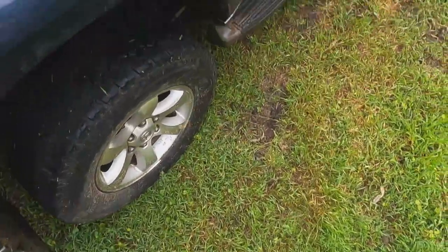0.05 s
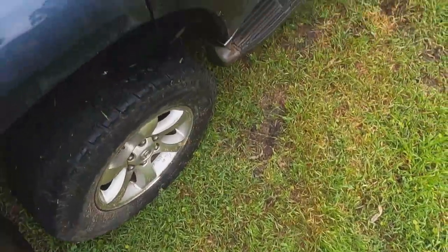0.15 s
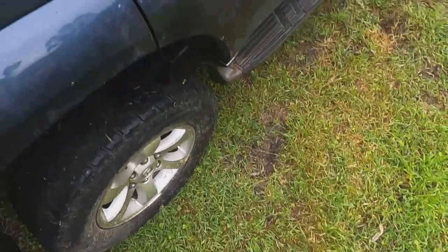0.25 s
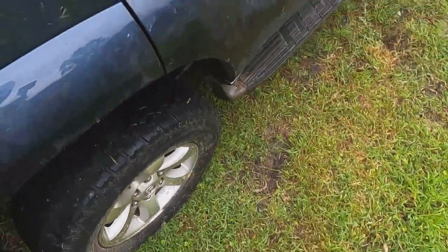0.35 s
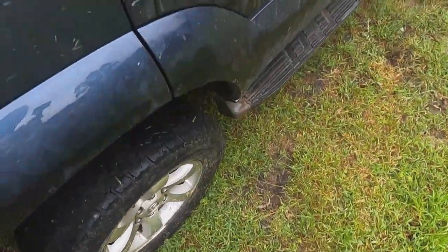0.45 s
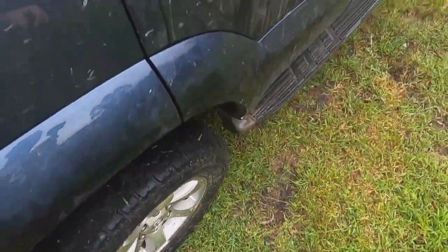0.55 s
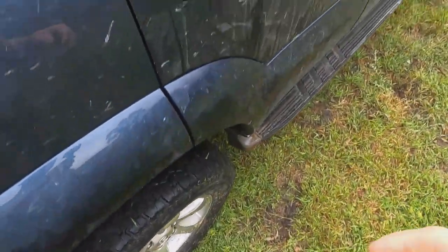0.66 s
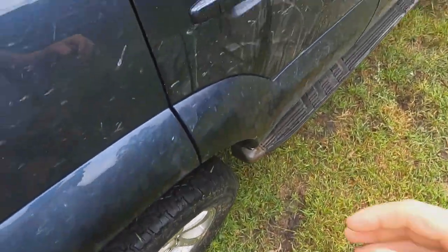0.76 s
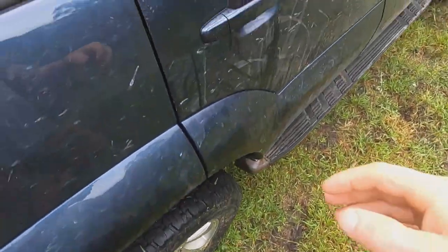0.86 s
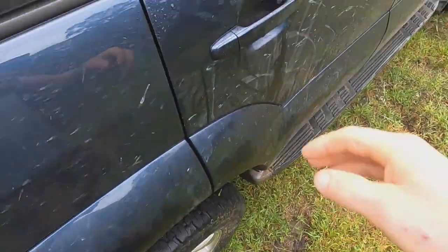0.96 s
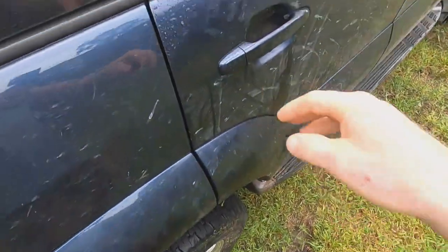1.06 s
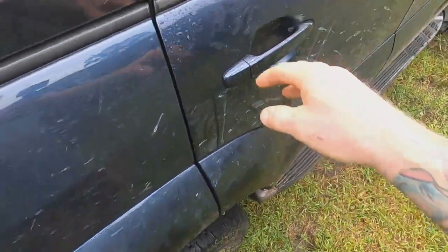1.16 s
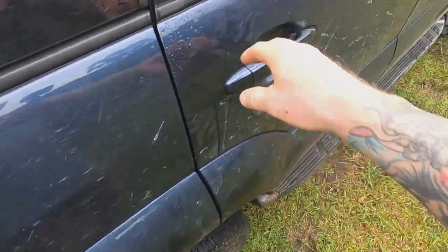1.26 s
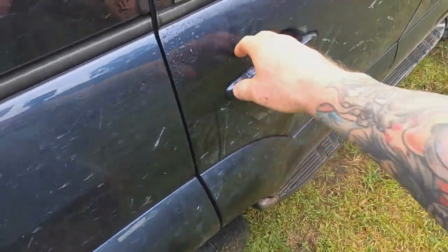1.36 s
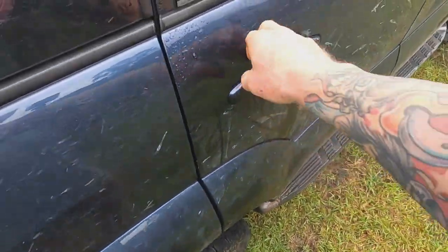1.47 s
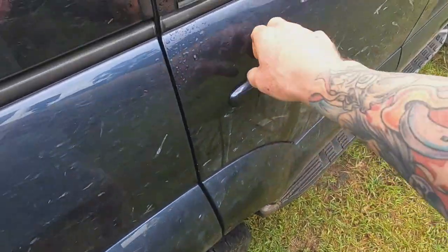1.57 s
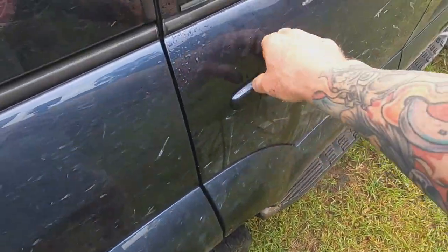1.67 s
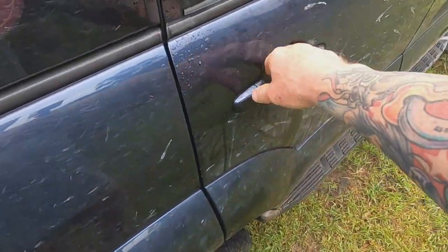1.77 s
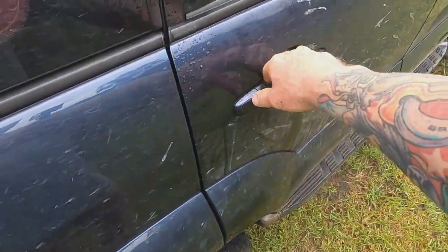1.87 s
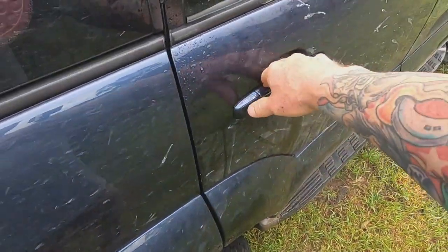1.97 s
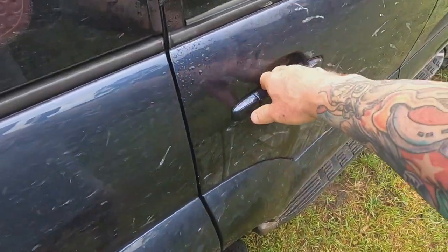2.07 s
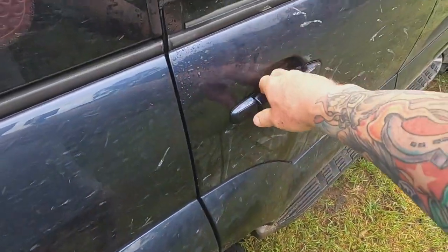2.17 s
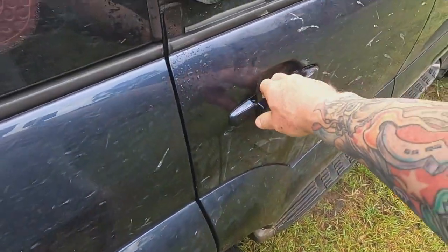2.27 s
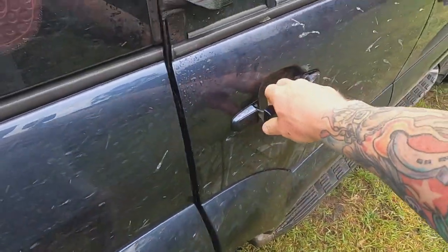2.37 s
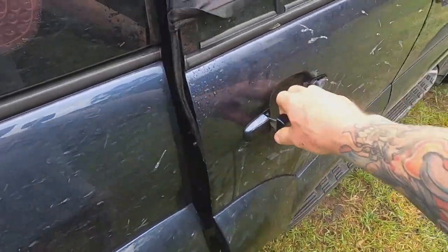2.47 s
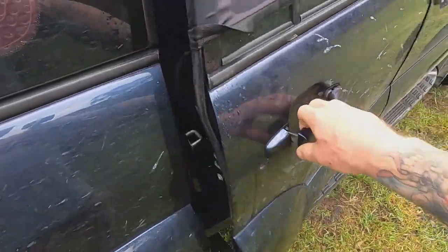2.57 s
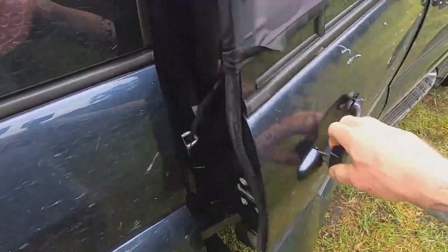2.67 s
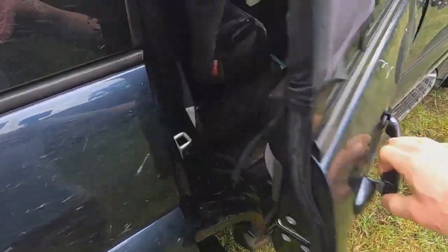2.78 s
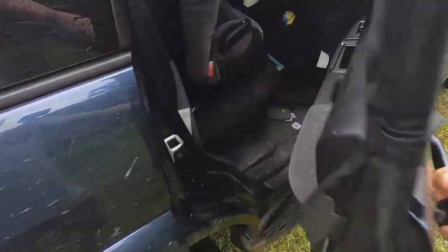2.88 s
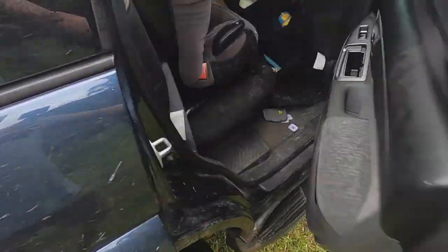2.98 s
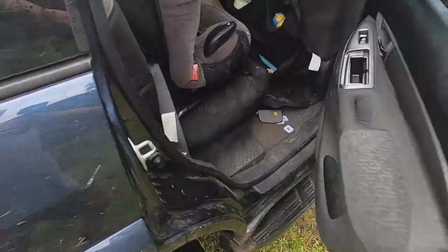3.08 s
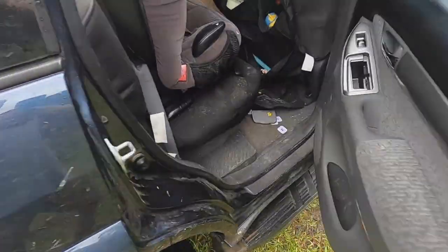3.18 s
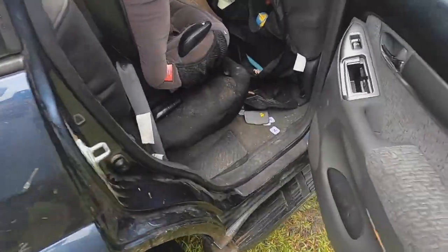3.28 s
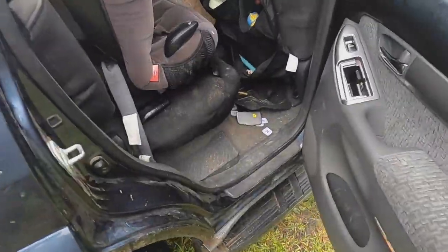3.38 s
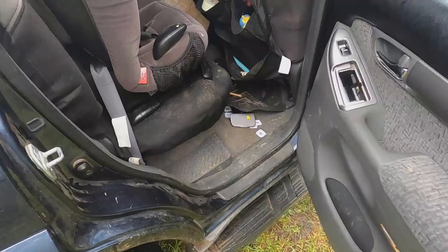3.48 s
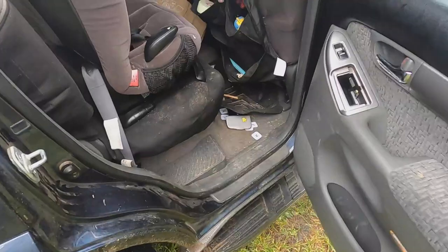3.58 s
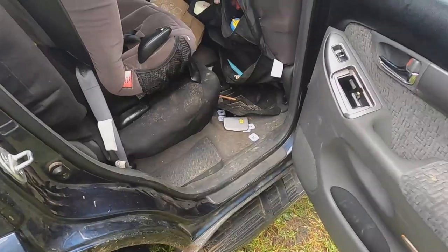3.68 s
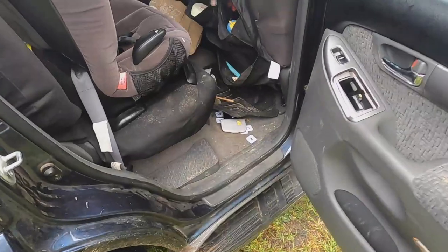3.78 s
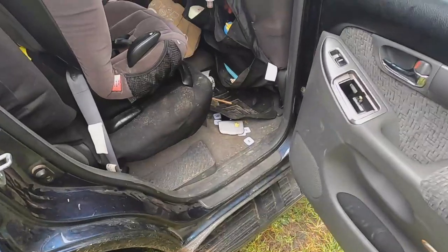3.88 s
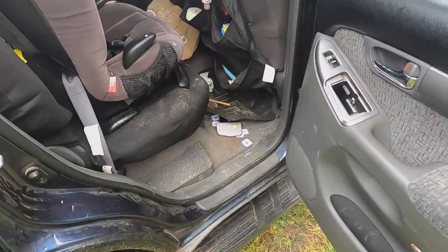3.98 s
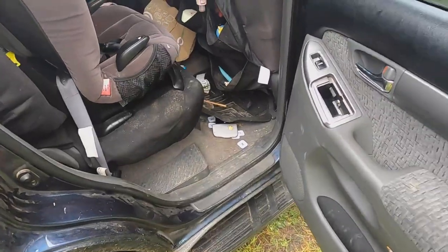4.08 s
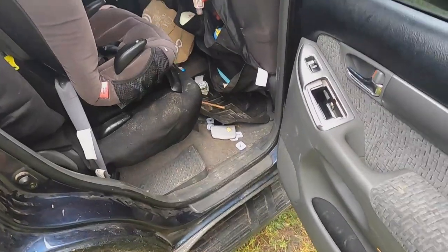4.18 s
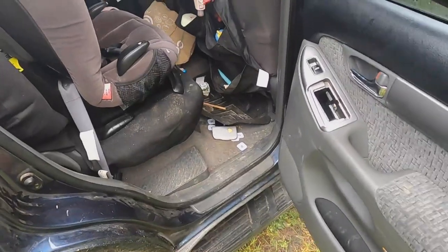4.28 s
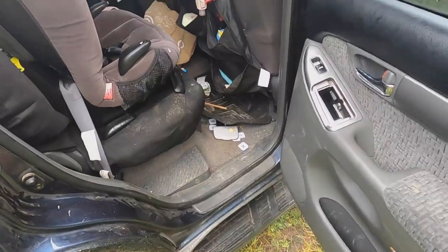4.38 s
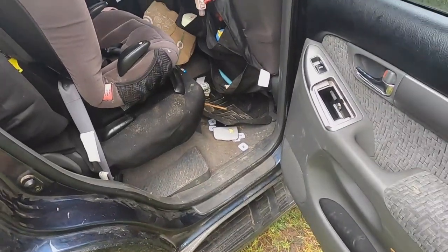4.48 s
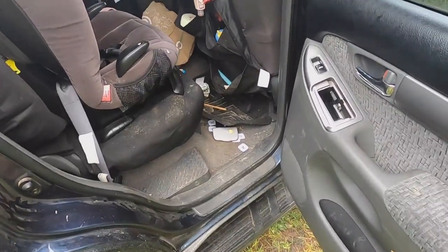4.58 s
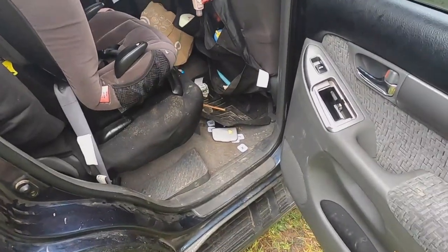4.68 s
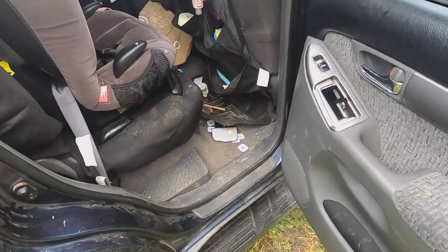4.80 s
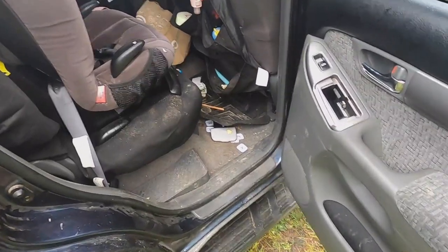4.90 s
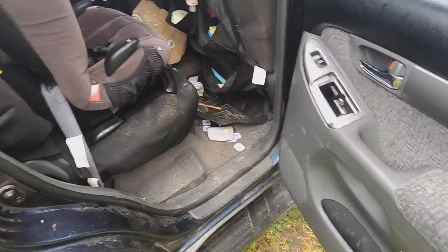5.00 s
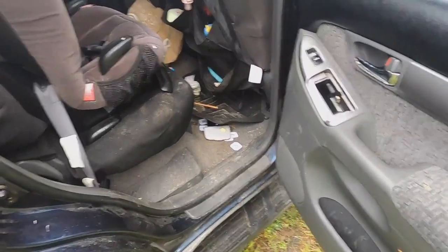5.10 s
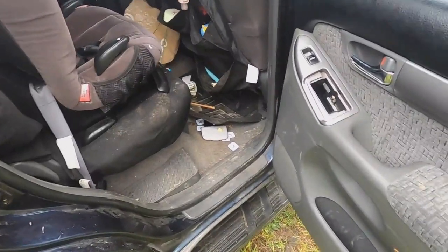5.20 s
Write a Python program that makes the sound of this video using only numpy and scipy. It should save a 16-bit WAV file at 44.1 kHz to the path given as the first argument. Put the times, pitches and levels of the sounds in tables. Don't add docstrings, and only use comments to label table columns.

```python
import sys
import numpy as np
from scipy import signal
from scipy.fft import rfft, irfft, next_fast_len
from scipy.io import wavfile
from scipy.ndimage import uniform_filter1d, map_coordinates

SR = 44100
rng = np.random.default_rng(int(sys.argv[2]) if len(sys.argv) > 2 else 0)


def wav_record(signal):
    frames = np.transpose(np.atleast_2d(signal))
    bounded = np.clip(frames, -1, 1)
    quanta = np.round(bounded * 32767).astype(np.int16)
    wavfile.write(sys.argv[1], SR, quanta)


def field_ratio(decibels):
    return 10 ** (np.asarray(decibels, dtype=float) / 20)


N = 231418


def unit(x):
    return x / np.sqrt(np.mean(x ** 2) + 1e-20)


def along(points, hz):
    f, v = np.transpose(points)
    return np.interp(np.log(hz + 1), np.log(f + 1), v)


def curve(rows):
    s, values = np.transpose(rows)
    return np.interp(np.arange(N) / SR, s, values)


def wobble(rate_hz):
    knots = rng.standard_normal(int(N * rate_hz / SR) + 4)
    return map_coordinates(knots, [np.arange(N) * rate_hz / SR])


def filtered(x, response):
    m = next_fast_len(len(x) + 8192)
    return irfft(rfft(x, m) * response(np.fft.rfftfreq(m, 1 / SR)), m)[:len(x)]


def coloured(x, spectrum):
    return unit(filtered(x, lambda hz: field_ratio(along(spectrum, hz))))


def noise(spectrum, size=N):
    return coloured(rng.standard_normal(size), spectrum)


def lumpy_noise(depth_db, rate_hz):
    return rng.standard_normal(N) * field_ratio(depth_db * wobble(rate_hz))


def add(track, s, x):
    at = round(s * SR)
    x = x[max(-at, 0):]
    part = track[max(at, 0):][:len(x)]
    part += x[:len(part)]


def swells(rows, shape):
    t = np.arange(N) / SR
    gain = np.zeros(N)
    for peak_s, rise_s, fall_s, db in rows:
        distance = np.where(t < peak_s, (peak_s - t) / rise_s, (t - peak_s) / fall_s)
        gain += field_ratio(db - 20 * distance ** shape)
    return gain


def hollow(x, modes):
    def response(f):
        total = 0
        for k, (centre_hz, width_hz, db) in enumerate(modes):
            damping = 1j * f * width_hz
            total = total + (-1) ** k * field_ratio(db) * damping / (centre_hz ** 2 - f ** 2 + damping)
        return total / (1 + (f / 4500) ** 4)
    return unit(filtered(x, response))


def struck(blows, modes, rattle_hz, rattle_t60_s):
    # (multiple of centre frequency [1], level [dB])
    crack = [(.12, -37.5), (.5, 14.5), (1, 6.5), (2, 2), (3.5, -20), (6, -34), (14, -65.5)]
    out = np.zeros(N)
    t = np.arange(SR // 2) / SR
    hz, level_db, t60_s = np.transpose(modes)[..., None]
    sign = (-1) ** np.arange(len(hz))[:, None]
    contact_s = t[::round(0.002 * SR)]
    for s, db, soft_hz, rattle_db in blows:
        luck = rng.standard_normal((2, len(hz), 1))
        reach = sign * field_ratio(level_db + 1.5 * luck[0]) / (1 + (hz / soft_hz) ** 2)
        twin = 0.56 * np.sin(2 * np.pi * hz * (1.07 + 0.025 * luck[1]) * t)
        tones = np.sin(2 * np.pi * hz * t) + twin
        ring = np.sum(reach * field_ratio(-60 * t / t60_s) * tones, axis=0)
        ring = ring * (1 - np.exp(-t * soft_hz))

        centre_hz = rattle_hz * (soft_hz / 1000) ** 0.39
        rattle = noise([(k * centre_hz, d) for k, d in crack], size=len(t))
        rattle = rattle * field_ratio(-60 * t / rattle_t60_s) * (1 - np.exp(-t / 0.0015))
        chatter = np.r_[1, rng.standard_normal(len(contact_s) - 1)]
        rattle = rattle * field_ratio(4 * np.interp(t, contact_s, chatter) - 1.5)
        add(out, s, field_ratio(db + 1) * ring + field_ratio(rattle_db) * rattle)
    return out


def latch():
    # (time [s], level [dB], softness [Hz], rattle level [dB])
    blows = [(2.505, -36, 300, -38), (2.514, -8.5, 200, -44), (2.519, -22.5, 2000, -20.5),
             (2.523, -33, 900, -15.5), (2.528, -9.5, 350, -38), (2.536, -26, 300, -40),
             (2.5445, -23.5, 2500, -22.5), (2.547, -18, 3000, -19), (2.556, -21.5, 1490, -23.5),
             (2.575, -33.5, 1500, -39), (2.583, -34, 1200, -39), (2.596, -28.5, 900, -26),
             (2.603, -34.5, 1100, -27.5), (2.614, -33, 2000, -33.5), (2.65, -27.5, 200, -44)]
    # (frequency [Hz], level [dB], t60 [s])
    shell = [(36.4, -2, 0.16), (50.4, -9.5, 0.24), (88.6, -19.5, 0.49), (132.4, -5, 0.083), (163, -9, 0.19),
             (215, -5, 0.084), (257, 1.5, 0.023), (387.3, -13, 0.19), (450, -16.5, 0.23),
             (662, -3.5, 0.081), (806, -5, 0.088), (860, -1, 0.067), (956, -6.5, 0.13), (1178, -2.5, 0.045),
             (1430, -9, 0.071), (1764, -23, 0.073), (2350, -7, 0.012), (3000, -4.5, 0.032)]
    return struck(blows, shell, 915, 0.036)


def handle_grab():
    # (time [s], level [dB], softness [Hz], rattle level [dB])
    blows = [
        (1.556, -48, 300, -58),
        (1.568, -32.5, 400, -54),
        (1.574, -39, 400, -51),
        (1.583, -28.5, 280, -44),
    ]
    # (frequency [Hz], level [dB], t60 [s])
    panel = [(50.5, -1.5, 0.28), (93.5, -10, 0.39), (148.4, 0, 0.22), (238.7, -1, 0.21), (450, -24, 1)]
    return struck(blows, panel, 1500, 0.098)


def rods_pull():
    # (time [s], level [dB], softness [Hz], rattle level [dB])
    blows = [
        (2.291, -28.5, 900, -33.5),
        (2.302, -26.5, 590, -49),
        (2.314, -44, 698, -40),
        (2.326, -27.5, 510, -54),
        (2.413, -32, 900, -40),
    ]
    # (frequency [Hz], level [dB], t60 [s])
    rods = [(157.4, -17, 0.36), (243, 1, 0.059), (350, -4, 0.11), (465, -7, 0.11), (670, -6, 0.13),
            (787, -7, 0.24), (1190, -11, 0.038), (1540, -30, 0.063), (2800, -34, .04)]
    return struck(blows, rods, 740, 0.16)


def linkage():
    # (time [s], level [dB], softness [Hz], rattle level [dB])
    lift = [
        (2.341, -29.5, 2496, -31.5),
        (2.347, -32.5, 1200, -43),
        (2.400, -48, 2500, -35),
        (2.409, -37, 900, -45),
        (2.419, -41, 1500, -46),
    ]
    # (time [s], level [dB], softness [Hz], rattle level [dB])
    snap = [
        (2.403, -35.5, 2520, -37.5),
        (3.3, -51, 2500, -50.5),
        (3.37, -52, 2500, -50.5),
    ]
    # (frequency [Hz], level [dB], t60 [s])
    link = [(262, -11, 0.036), (400, -4, 0.1), (600, -4.5, 0.18), (682, 1.5, 0.049), (1098, -5, 0.057),
            (2680, 0, 0.032)]
    return struck(lift, link, 840, 0.026) + struck(snap, link, 2140, 0.04)


def fastener_pop():
    # (time [s], level [dB], softness [Hz], rattle level [dB])
    blows = [
        (2.665, -30, 9000, -47),
    ]
    # (frequency [Hz], level [dB], t60 [s])
    fastener = [(900, -5, .012), (1700, 0, 0.014), (2700, 0.5, .012), (4240, -3, .01), (5900, -2.5, .012),
                (8900, -13, .008), (12000, -24, .008)]
    return struck(blows, fastener, 1500, 0.01)


def seals():
    # (time [s], level [dB], centre frequency [Hz], t60 [s])
    ticks = [(1.558, -32, 1220, 0.025), (1.575, -41, 1250, 0.017), (1.583, -34, 1150, 0.017),
             (2.271, -34.5, 3800, 0.022), (2.404, -21, 3000, 0.043), (2.517, -41.5, 5340, 0.28),
             (2.546, -45.5, 5580, 0.076), (2.519, -31, 4810, 0.01), (2.553, -31.5, 3200, .025),
             (2.577, -34, 2700, .015), (2.615, -35, 2400, .015), (2.617, -48, 6000, .006),
             (2.637, -46.5, 6050, 0.0065), (2.6525, -37, 6800, .005), (2.665, -30.5, 5800, 0.02),
             (2.672, -29.5, 3520, 0.013), (2.701, -43, 6500, .008), (2.704, -44, 6500, 0.008),
             (2.7264, -25.5, 4000, 0.012), (2.7244, -40.5, 10000, 0.015), (2.7329, -37.5, 9500, 0.016),
             (2.738, -33, 5000, 0.023), (2.733, -29.5, 800, 0.036), (2.74, -34, 1270, 0.11),
             (2.747, -25.5, 3880, 0.033), (2.749, -37.5, 10300, 0.017)]
    out = np.zeros(N)
    t = np.arange(SR // 20) / SR
    for s, db, centre_hz, t60_s in ticks:
        colour = [(centre_hz / 14, -30), (centre_hz / 6, -6), (centre_hz, 0),
                  (centre_hz * 1.42, -12), (centre_hz * 1.79, -16), (centre_hz * 4, -48)]
        decay = field_ratio(-60 * t / t60_s) + field_ratio(1.5 - 60 * t / 0.0023)
        attack = 1 - np.exp(-t / 0.0005)
        add(out, s, field_ratio(db - 8) * decay * attack * noise(colour, size=len(t)))
    return out


def stop_bump():
    # (time [s], level [dB], softness [Hz], rattle level [dB])
    blows = [
        (3.252, -37, 505, -52),
        (3.286, -32, 600, -46),
        (3.34, -56, 600, -45),
        (3.98, -44, 400, -53.5),
        (4.024, -41, 300, -75),
    ]
    # (frequency [Hz], level [dB], t60 [s])
    stop = [(36, -22.5, 0.45), (96.6, -1, 0.22), (204, 0, 0.075), (275, 0, 0.084), (399, -2, 0.078),
            (600, -13, 0.16), (900, -39, .06)]
    return struck(blows, stop, 1600, 0.15)


def sill_landing():
    # (time [s], level [dB], softness [Hz], rattle level [dB])
    blows = [
        (4.305, -44.5, 300, -52),
        (4.319, -27.5, 600, -35),
        (4.334, -27, 300, -53.5),
        (4.365, -27.5, 80, -62),
    ]
    # (frequency [Hz], level [dB], t60 [s])
    sill = [(36, -6.5, 0.32), (102.6, 1, .35), (160, -10.5, 0.27), (217, 2, .1), (280, -2.5, .1),
            (382, -8.5, .1), (556, -7, .07), (1066, -30, 0.047), (1432, -28, .05)]
    return struck(blows, sill, 1100, 0.1)


def frame_knock():
    # (time [s], level [dB], softness [Hz], rattle level [dB])
    blows = [
        (.698, -54.5, 400, -50),
        (1.262, -53, 300, -46),
        (4.488, -34.5, 495, -53),
        (4.520, -27, 1544, -21),
        (4.524, -26.5, 700, -28.5),
        (4.527, -12.5, 900, -22.5),
        (4.5465, -12, 400, -30.5),
        (4.6, -31.5, 400, -59.5),
    ]
    # (frequency [Hz], level [dB], t60 [s])
    frame = [(85, -22, 0.24), (99, -19, 0.27), (157.2, -14.5, 0.31), (210, -6.5, 0.21), (240, -6, 0.22),
             (259, 10, 0.044), (350, -7, 0.12), (486, -8, 0.093), (640, -11, 0.102), (891, -20.5, 0.13),
             (1352, -24.5, 0.1), (1770, -30.5, .05)]
    return struck(blows, frame, 840, 0.09)


def effort_over_middle_db():
    # (time [s], level [dB])
    effort = [(0, -91), (1.1, -76.5), (1.28, -72), (1.95, -66.5), (2.27, -60.5), (2.42, -38), (2.48, -55),
              (2.72, -47), (2.86, -60.5), (2.89, -45), (3.15, -51.5), (3.3, -39.5), (3.44, -45),
              (3.62, -56), (4.25, -57.5), (4.47, -55.5), (4.54, -45.5), (4.76, -76.5)]
    return curve(effort) + 55


def hinge_groan(effort_db):
    # (centre frequency [Hz], width [Hz], level [dB])
    hinge = [(102.9, 29, -13.5), (157.8, 24, 1), (230, 22, -4.5), (276.6, 14.5, -4)]
    # (peak time [s], rise [s], fall [s], level [dB])
    catches = [
        (.69, .05, 0.29, -70),
        (2.1, .1, 0.09, -65),
        (3.99, 0.076, 0.028, -47.5),
        (4.33, 0.022, 0.13, -33.5),
    ]
    gain = field_ratio(effort_db - 55) + swells(catches, shape=1.1)
    return field_ratio(2.3) * gain * hollow(lumpy_noise(1.7, 40), hinge)


def scrape(effort_db):
    # (centre frequency [Hz], width [Hz], level [dB])
    skin = [(415.6, 68, 2.5), (684.4, 110, 0), (725.4, 120, -0.5), (1150, 320, -5), (1620, 1400, -10.5)]
    # (peak time [s], rise [s], fall [s], level [dB])
    rubs = [
        (0, .1, 0.63, -62),
        (.48, 0.2, 0.17, -67.5),
        (.69, 0.042, 0.29, -66.5),
        (1.22, 0.16, 0.12, -58.5),
        (1.85, 0.86, 0.94, -57),
        (3.0, 0.32, 1, -53),
        (4.48, 0.0097, 0.11, -44.5),
        (5.1, 0.22, 0.36, -66.5),
    ]
    gain = field_ratio(-59.5 + 0.53 * effort_db) + swells(rubs, shape=1.23)
    return field_ratio(-4) * gain * hollow(lumpy_noise(1.6, 90), skin)


def check_strap():
    # (peak time [s], rise [s], fall [s], level [dB])
    moans = [
        (3.17, 0.092, .09, -45),
        (3.322, 0.037, 0.041, -42),
        (3.392, 0.034, 0.026, -34),
        (3.432, 0.024, 0.0096, -36),
    ]
    # (peak time [s], rise [s], fall [s], level [dB])
    drags = [
        (2.9, .03, 0.15, -55.5),
        (3.07, 0.058, .08, -60),
        (3.17, 0.087, 0.092, -48.5),
        (3.325, 0.058, 0.035, -46),
        (3.365, 0.028, 0.07, -51.5),
    ]
    # (centre frequency [Hz], width [Hz], level [dB])
    skin = [(800, 41, 1.5), (970, 16, 2.5), (1175, 140, -6), (1436, 41, -3), (2000, 270, -12)]
    phase = 2 * np.pi * 268 * np.arange(N) / SR + 0.36 * wobble(40)
    moan = swells(moans, shape=1.8) * np.sqrt(2) * np.sin(phase)
    drag = swells(drags, shape=1.5) * hollow(lumpy_noise(2.6, 120), skin)
    return moan + drag


def air_sway(effort_db):
    # (frequency [Hz], level [dB])
    colour = [(12, -13.5), (22, 8), (32, -19.5), (50, -9), (80, -10.5), (200, -72)]
    # (peak time [s], rise [s], fall [s], level [dB])
    lurches = [(.2, 0.71, 1.34, -75.5), (1.3, 0.025, 0.07, -61), (2.36, 0.1, .1, -57),
               (2.86, 0.21, 0.036, -48), (3.02, 0.09, 0.36, -49.5), (3.29, 0.023, 1.5, -38.5),
               (3.6, 0.25, 0.065, -42), (3.87, 0.17, 0.15, -63), (4.0, 0.12, 0.038, -44.5),
               (4.11, 0.072, 0.081, -52), (4.37, 0.045, .3, -49.5), (4.6, 0.08, 0.06, -64.5)]
    breeze_db = -99.5
    gain = field_ratio(breeze_db) + field_ratio(-67.5 + 1.2 * effort_db) + swells(lurches, shape=1.6)
    return field_ratio(4) * gain * unit(field_ratio(3.3 * wobble(20)) * noise(colour))


def swing():
    effort_db = effort_over_middle_db()
    return check_strap() + air_sway(effort_db) + hinge_groan(effort_db) + scrape(effort_db)


def trees(x):
    # (frequency [Hz], t60 [s])
    decay = [(500, 0.094), (3000, 0.22), (8000, 0.098)]
    hz, t, z = signal.stft(rng.standard_normal(SR // 2), SR, nperseg=256)
    z = z * field_ratio(-60 * t / along(decay, hz)[:, None])
    tail = signal.istft(z, SR, nperseg=256)[1]
    return signal.fftconvolve(np.pad(x, (300, 0)), tail / np.linalg.norm(tail))[:N]


def whistled(rows):
    out = np.zeros(N)
    for s, length_s, first_hz, last_hz, db in rows:
        u = np.arange(round(length_s * SR)) / (length_s * SR)
        change_hz = last_hz - first_hz
        bow_hz = max(0.354 * change_hz, 0.053 * change_hz)
        hz = first_hz + change_hz * u + 4 * bow_hz * u * (1 - u)
        envelope = np.abs(np.sin(np.pi * u ** 0.78)) ** 0.86
        add(out, s, field_ratio(db) * envelope * np.sin(2 * np.pi * np.cumsum(hz) / SR))
    return out


def sagging(rows):
    return [(s, length_s, hz * 1.004, hz * 0.996, db) for s, length_s, hz, db in rows]


def near_bird():
    glides = [(-.004, 0.028, 4260, 3000, -40), (0.117, 0.023, 4400, 2900, -39),
              (0.253, 0.0091, 5070, 4330, -45), (0.258, 0.009, 4400, 3870, -41),
              (0.362, 0.016, 3920, 3070, -41), (0.399, 0.027, 3290, 2140, -41),
              (.506, 0.013, 3490, 2320, -39.5), (0.529, .012, 2140, 2050, -49),
              (0.56, 0.036, 2260, 2650, -39), (0.719, 0.012, 3820, 3100, -40),
              (.732, 0.0083, 3030, 2200, -45), (0.907, 0.018, 3860, 2940, -40.5),
              (0.921, 0.025, 2800, 1890, -43), (1.091, 0.017, 3730, 2950, -39),
              (1.105, 0.018, 2870, 1920, -40), (1.287, 0.022, 3000, 1910, -41),
              (1.32, .057, 1754, 2065, -50.5), (1.647, 0.023, 2820, 2040, -42.5),
              (1.765, 0.0085, 4550, 3700, -47), (1.774, .016, 3690, 2950, -50),
              (.011, 0.011, 2900, 2050, -50), (.133, .012, 2320, 1900, -64),
              (2.012, 0.037, 2220, 2490, -49.5), (4.667, 0.026, 4930, 4720, -59)]
    # (time [s], length [s], frequency [Hz], level [dB])
    held = [(.379, 0.015, 3000, -35), (0.395, 0.012, 3430, -33.5), (0.489, 0.023, 3535, -44),
            (0.709, 0.017, 4080, -52), (1.125, 0.066, 1874, -50.5), (1.269, 0.021, 3090, -46.5),
            (1.45, 0.019, 2110, -48), (1.612, 0.02, 2680, -47), (1.631, 0.02, 3000, -47)]
    # (delay [s], level [dB])
    trunks = [(.011, -20), (.019, -18), (.028, -17), (.043, -22)]
    call = whistled(glides + sagging(held)) * field_ratio(3 * wobble(250))
    t = np.arange(SR // 30) / SR
    twigs = rng.standard_normal(len(t)) * field_ratio(-60 * t / 0.03)
    blur = signal.fftconvolve(call * field_ratio(5.4 * wobble(300)), twigs / np.linalg.norm(twigs))[:N]
    out = call + field_ratio(-7) * blur + field_ratio(-10.5) * trees(call * field_ratio(3.8 * wobble(150)))
    for delay_s, db in trunks:
        echo = np.pad(call + blur, (round(delay_s * SR), 0))[:N]
        out += field_ratio(db + 4.8 * wobble(200)) * echo
    return out


def far_bird():
    # (time [s], length [s], frequency [Hz], level [dB])
    whistles = [(3.552, 0.023, 4500, -59), (3.83, .015, 5500, -74), (3.954, .036, 6050, -65),
                (4.036, 0.016, 4740, -54), (4.068, .014, 4800, -64), (4.068, 0.012, 5220, -55),
                (4.15, 0.027, 6280, -70), (4.228, 0.023, 5540, -70), (4.307, 0.039, 5280, -54),
                (4.333, 0.042, 5220, -49.5), (4.394, 0.043, 5250, -60), (4.45, 0.046, 5250, -65.5),
                (4.53, .14, 5250, -71.5), (4.572, 0.076, 5830, -57.5), (4.622, 0.023, 5900, -57),
                (4.65, 0.041, 5800, -74), (4.76, 0.059, 5850, -76.5), (4.686, 0.03, 4726, -54.5),
                (4.846, 0.037, 5420, -62), (4.93, 0.027, 5410, -52), (4.874, 0.097, 5354, -54),
                (4.99, 0.056, 5400, -52.5), (5.05, 0.053, 5440, -63), (5.09, .06, 5400, -65),
                (5.157, 0.066, 5400, -75)]
    call = whistled(sagging(whistles)) * field_ratio(2.5 * wobble(150))
    return call + field_ratio(-10) * trees(call)


def grass():
    # (frequency [Hz], level [dB])
    colour = [(88, -32), (150, 4), (387, -2.5), (641, -49), (890, -5), (2960, 4), (3950, -5),
              (12400, -19.5), (15300, -33.5)]
    # (peak time [s], rise [s], fall [s], level [dB])
    rustles = [(0, .05, 0.018, -65), (.14, 0.27, 0.36, -70), (.3, 0.16, 0.62, -74.5),
               (.54, 0.12, 0.22, -71.5), (.7, 0.064, 0.091, -67.5), (1.05, 0.15, 0.3, -71.5),
               (1.25, 0.17, 0.08, -63.5), (1.6, 0.072, 0.38, -78.5), (3.25, 0.69, 0.38, -74),
               (3.7, 0.22, 0.9, -77), (4.33, 0.17, 0.12, -71.5), (4.66, 0.16, 0.32, -80),
               (5.1, 0.23, 0.23, -80.5)]
    bed_db = -96.5
    grains = rng.standard_normal(N) * field_ratio(0.88 * wobble(300) + 0.59 * wobble(27))
    return field_ratio(15.5) * (field_ratio(bed_db) + swells(rustles, shape=1.0)) * coloured(grains, colour)


def far_hiss():
    # (time [s], level [dB])
    air = [(0.0, -55.5), (0.58, -54.5), (0.72, -53), (0.96, -52.5), (1.1, -52.5), (1.83, -47.5),
           (2.09, -51), (2.32, -49), (2.47, -48.5), (2.57, -52.5), (2.73, -52), (2.97, -56), (3.22, -51),
           (3.6, -53), (4.47, -51), (4.76, -54), (5.25, -52.5)]
    # (frequency [Hz], level [dB])
    colour = [(12, -20.5), (20, -25), (54, -44), (92, -58), (360, -7.5), (546, -13.5), (610, -6.5),
              (901, -26.5), (1290, -1), (2590, 3), (3720, -3.5), (4910, -11), (5480, -14.5), (6130, -15),
              (15300, -34)]
    z = signal.stft(noise(colour), nperseg=512)[2]
    patches = uniform_filter1d(uniform_filter1d(rng.standard_normal(z.shape), 6, 0), 10, 1)
    hiss = signal.istft(z * field_ratio(1.9 * unit(patches)), nperseg=512)[1][:N]
    hiss = unit(filtered(hiss, lambda hz: 1 / (1 + (hz / 11500) ** 4)))
    top = filtered(hiss, lambda hz: 1 / (1 + (8800 / (hz + 1)) ** 12))
    return field_ratio(curve(air) - 1.63) * (hiss - top) + field_ratio(-56) * top


def scene():
    door = latch() + handle_grab() + rods_pull() + linkage() + fastener_pop() + seals()
    door = door + stop_bump() + sill_landing() + frame_knock()
    mix = door + field_ratio(-16.5) * trees(door) + swing()
    return (mix + near_bird() + far_bird() + grass() + far_hiss())[None]


def band_limit(x):
    return signal.sosfilt(signal.butter(12, 15480, fs=SR, output="sos"), x)


def record(dry):
    mix = filtered(dry[0], lambda hz: (hz < 15480) * 1j * hz / (12 + 1j * hz))
    return band_limit(mix[None])


dry = scene()
out = record(dry)
wav_record(out)
```